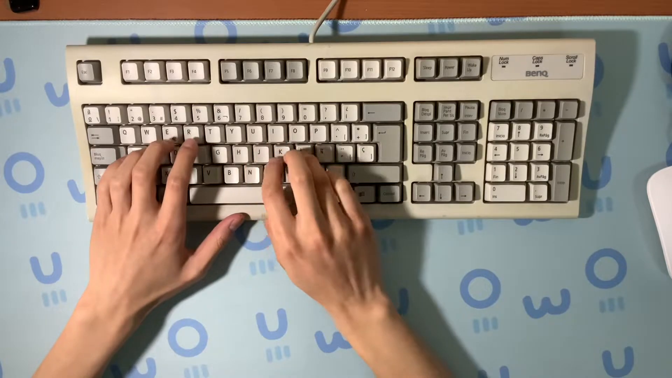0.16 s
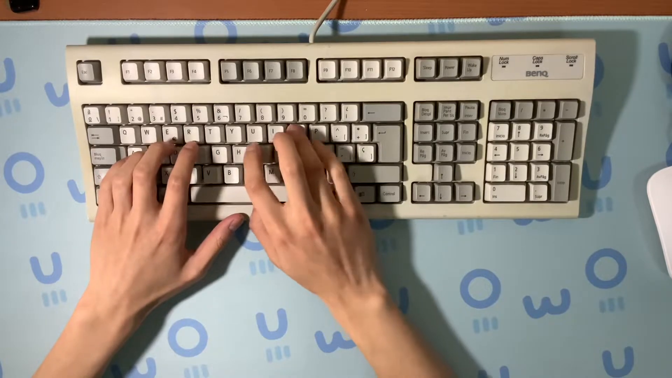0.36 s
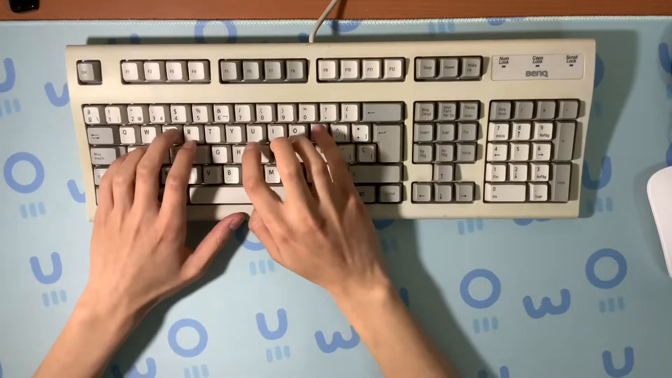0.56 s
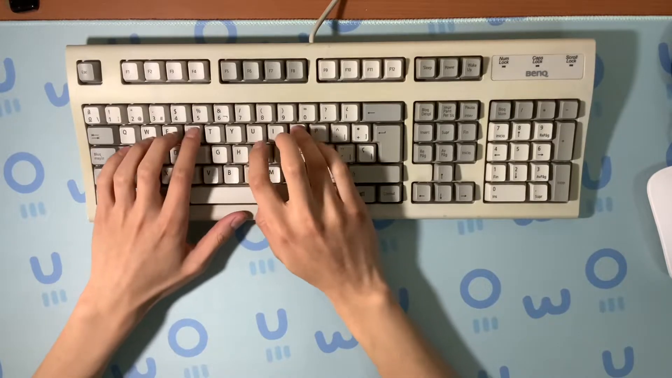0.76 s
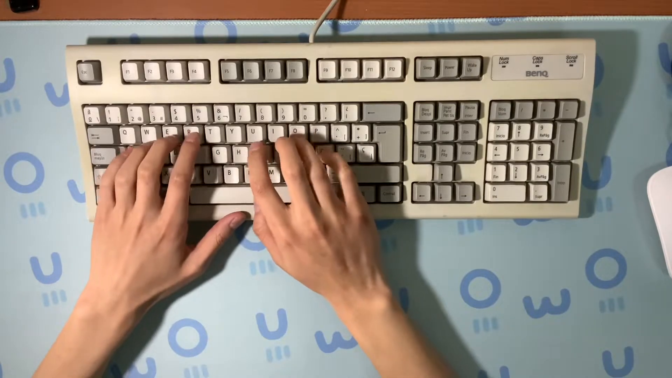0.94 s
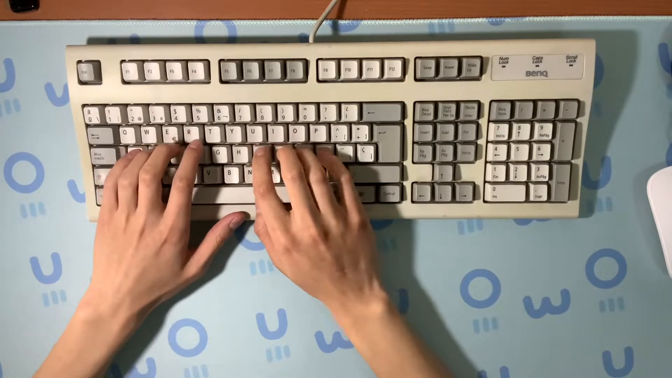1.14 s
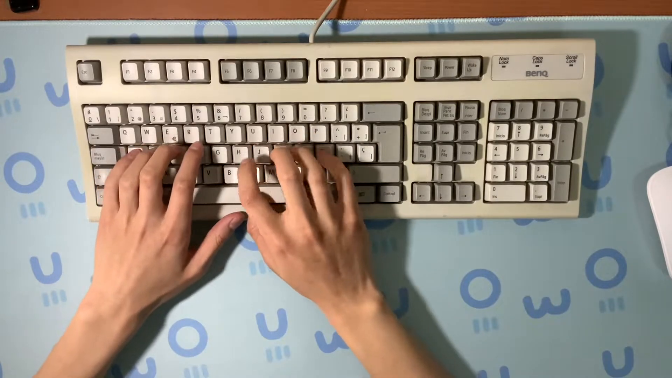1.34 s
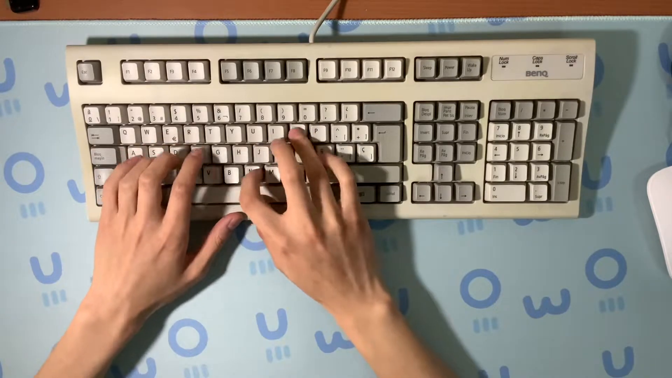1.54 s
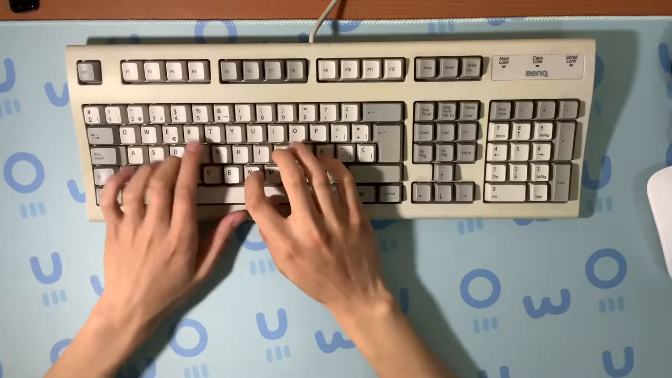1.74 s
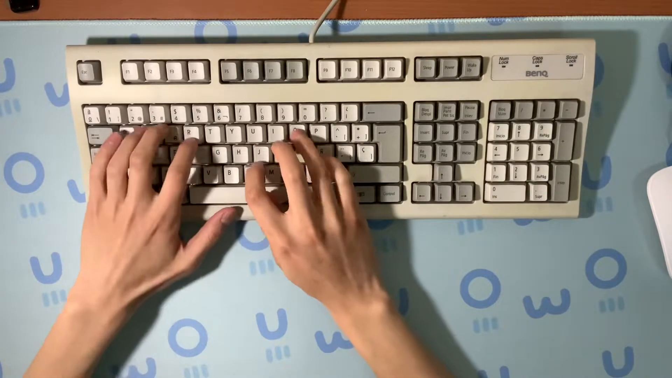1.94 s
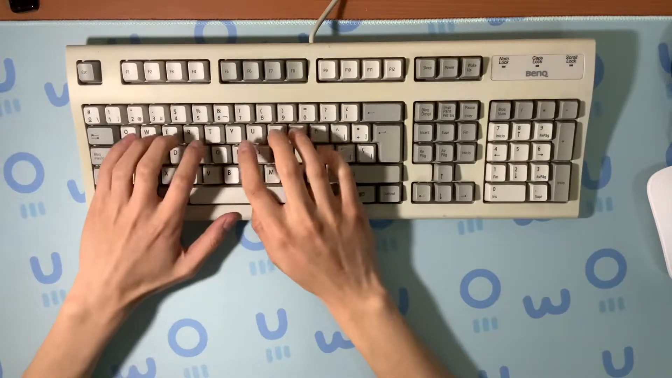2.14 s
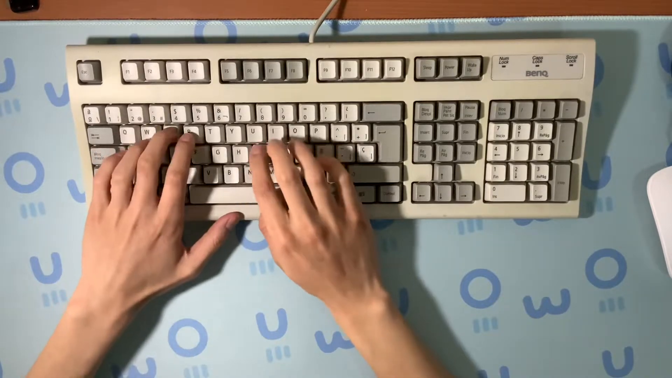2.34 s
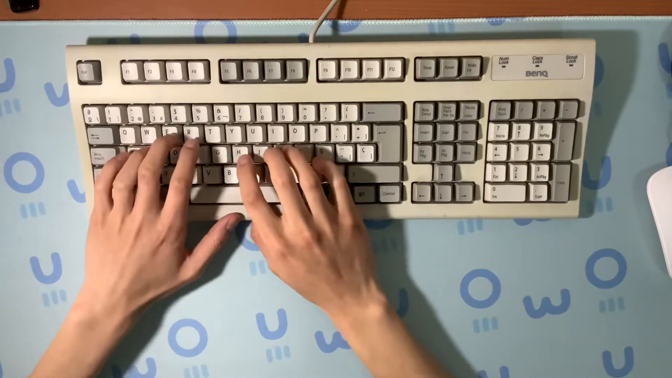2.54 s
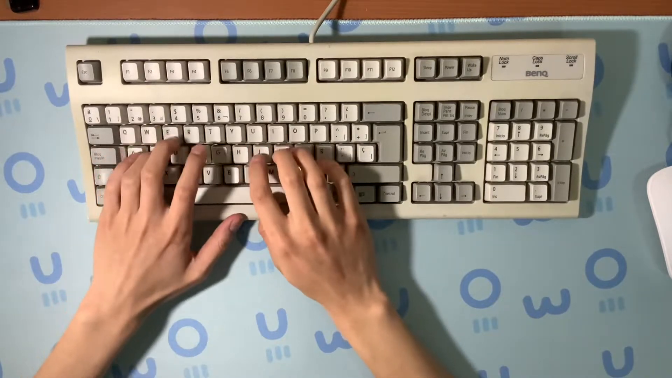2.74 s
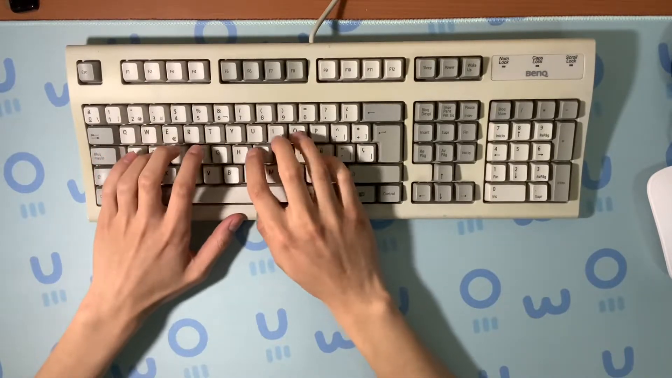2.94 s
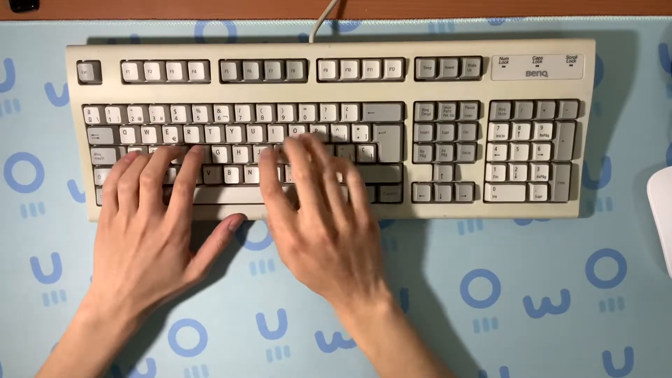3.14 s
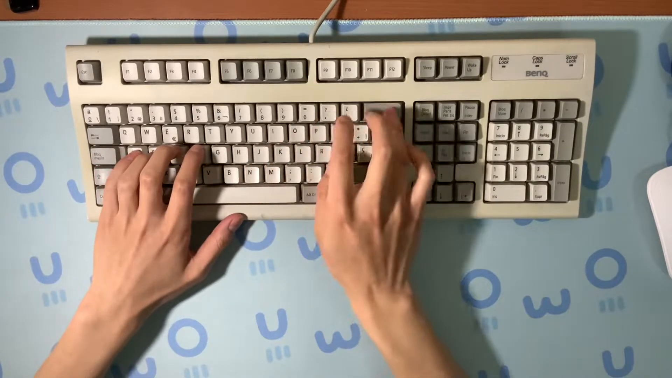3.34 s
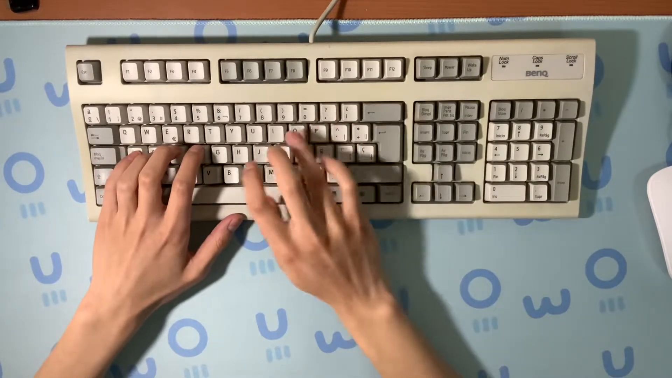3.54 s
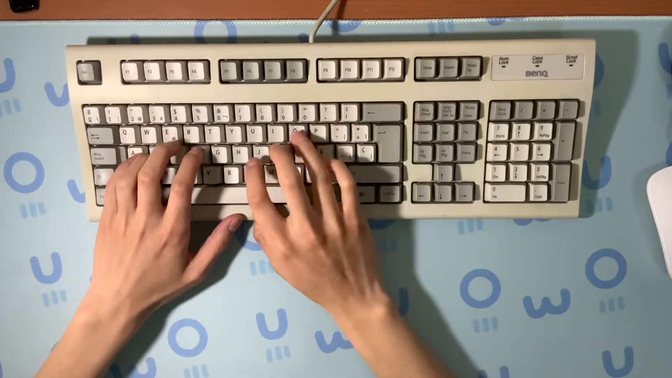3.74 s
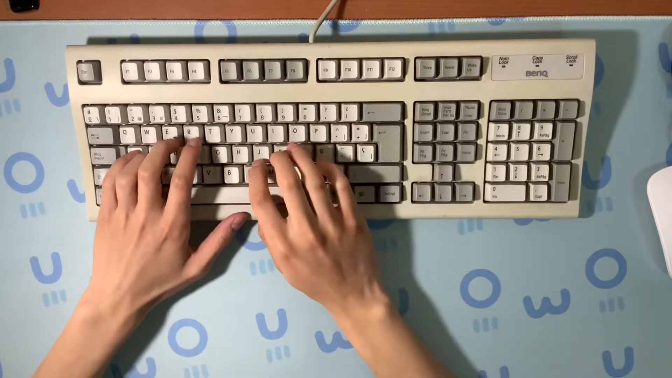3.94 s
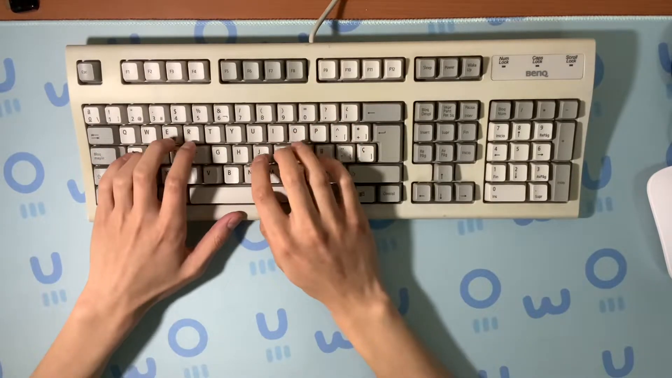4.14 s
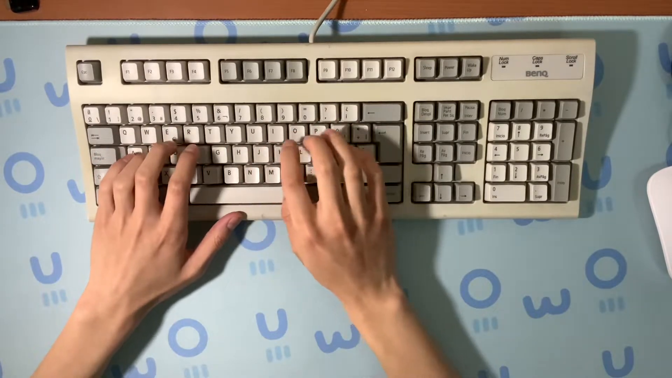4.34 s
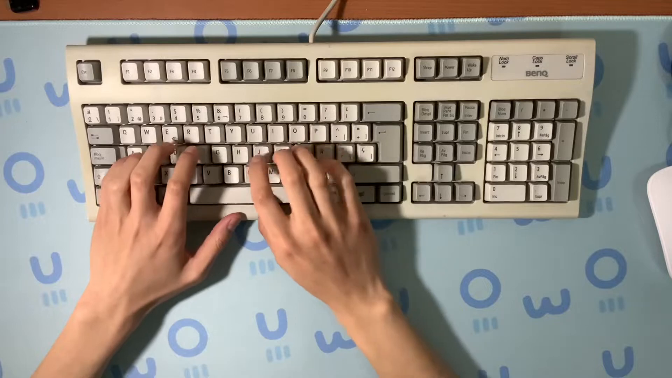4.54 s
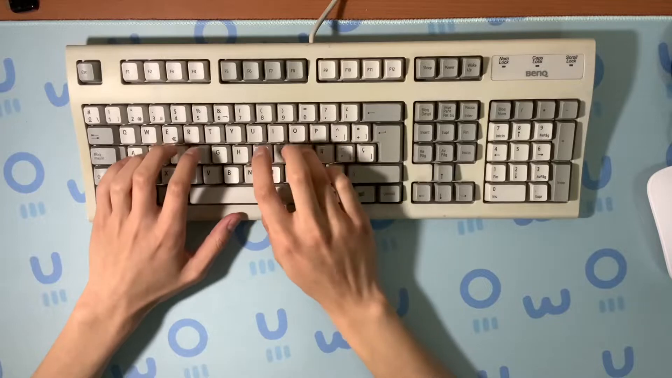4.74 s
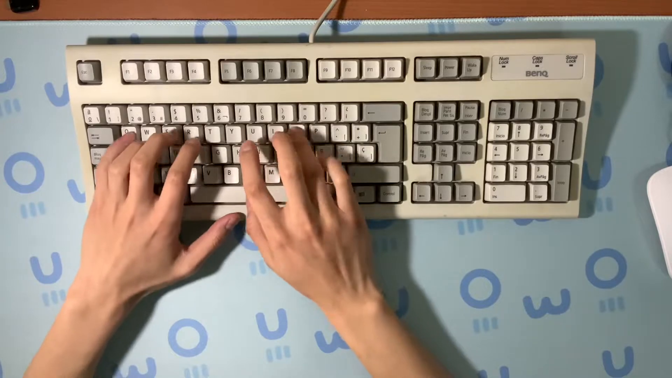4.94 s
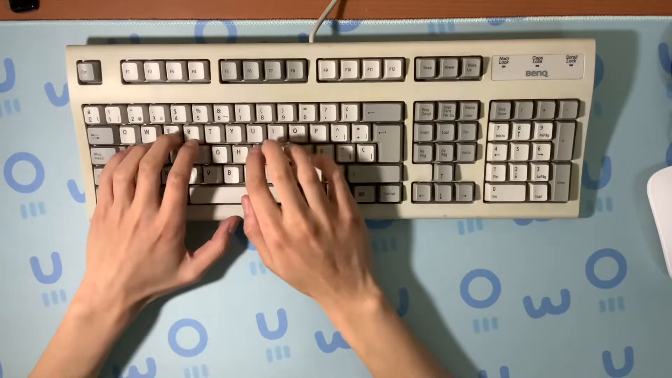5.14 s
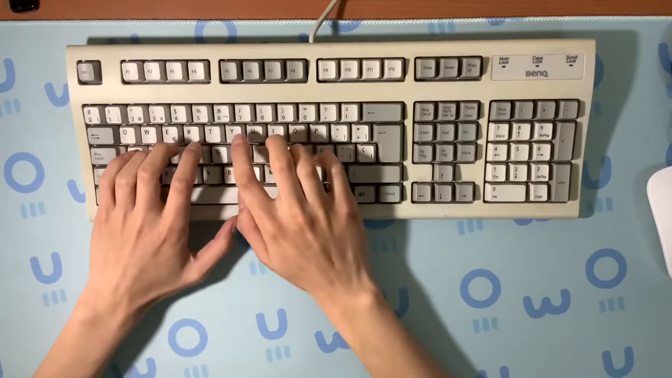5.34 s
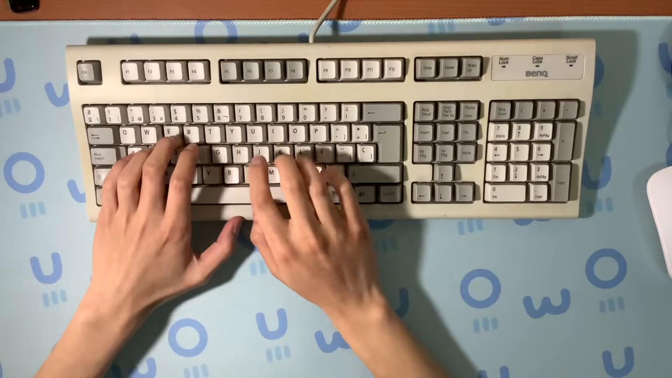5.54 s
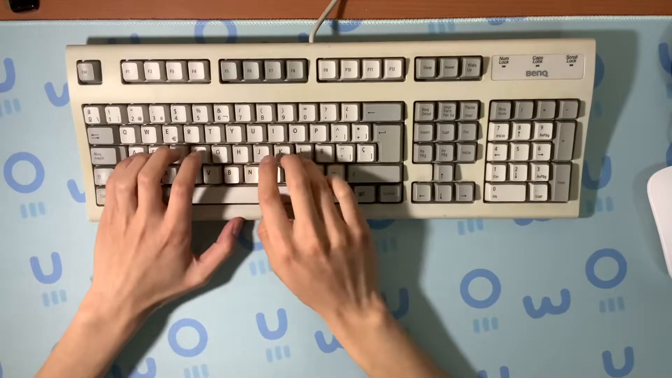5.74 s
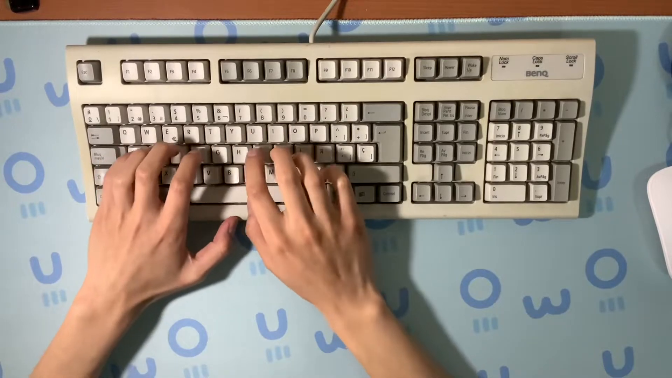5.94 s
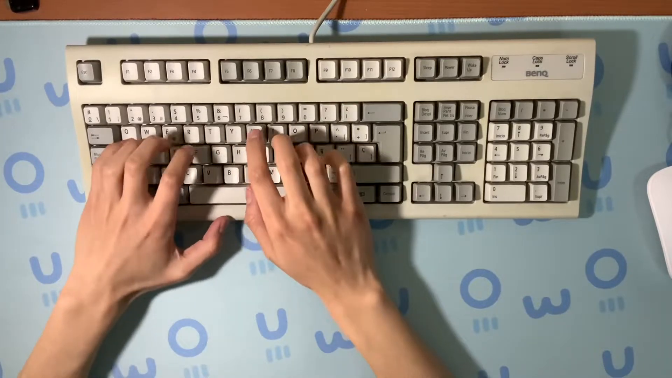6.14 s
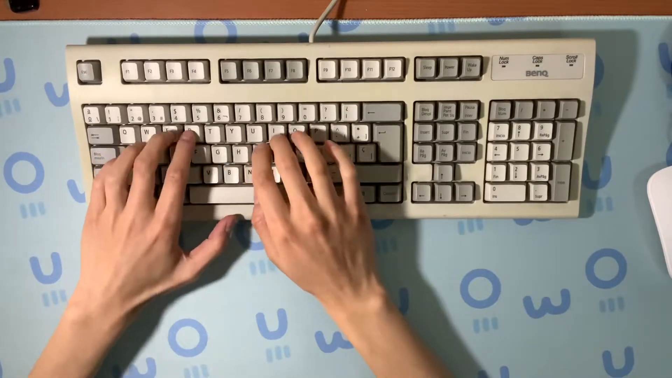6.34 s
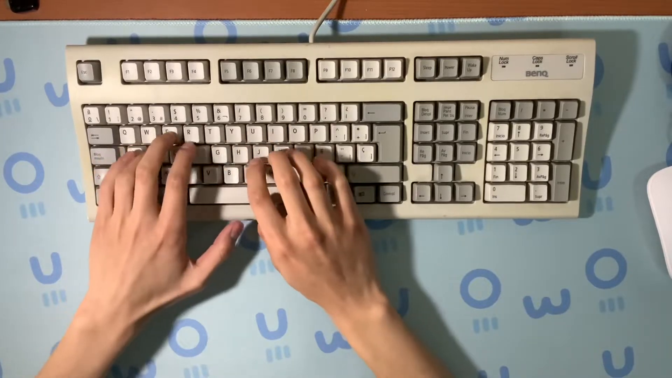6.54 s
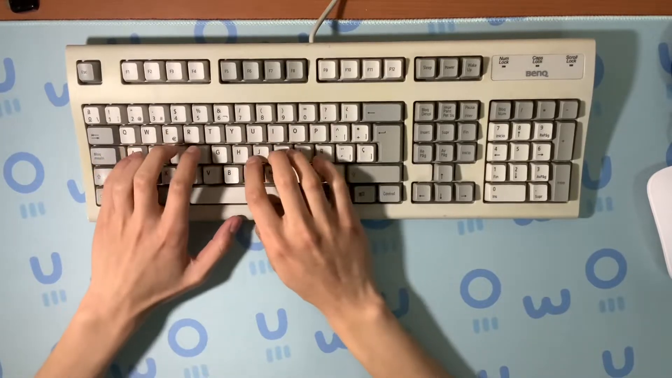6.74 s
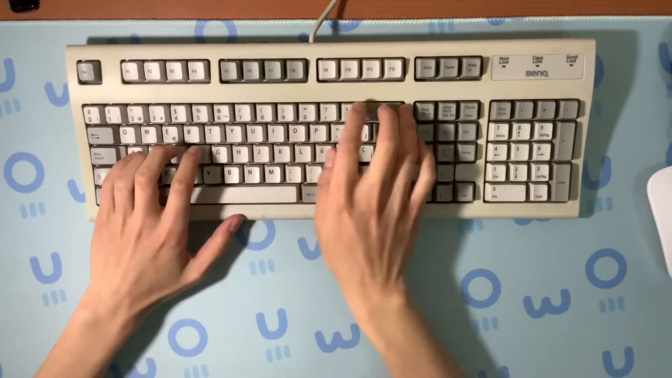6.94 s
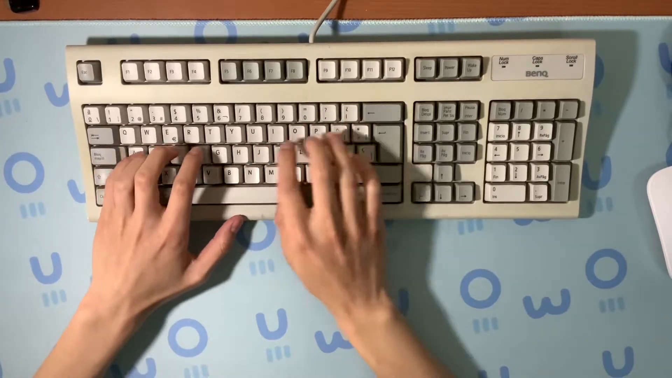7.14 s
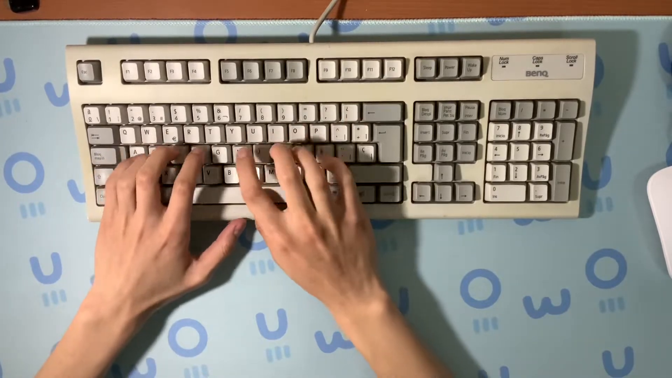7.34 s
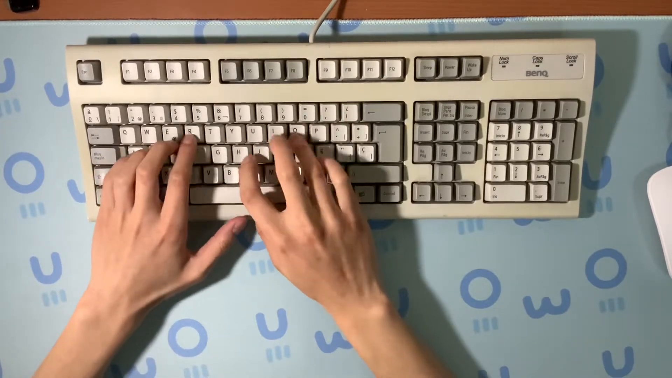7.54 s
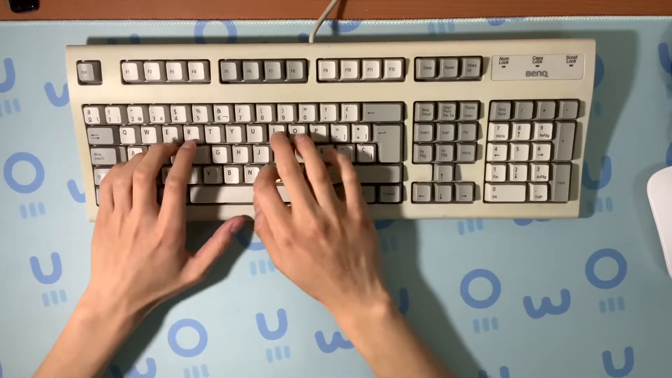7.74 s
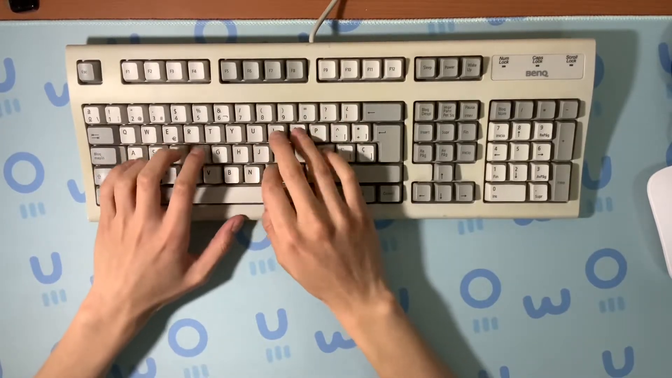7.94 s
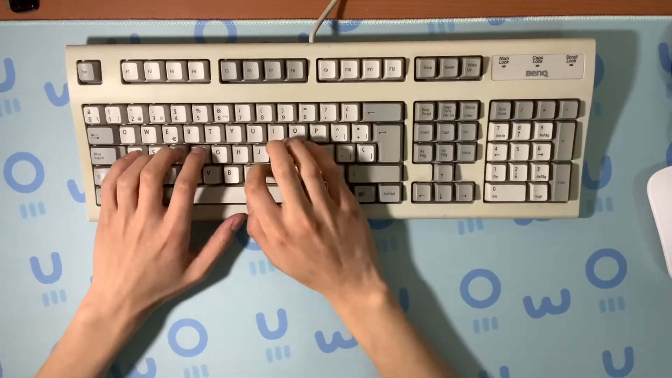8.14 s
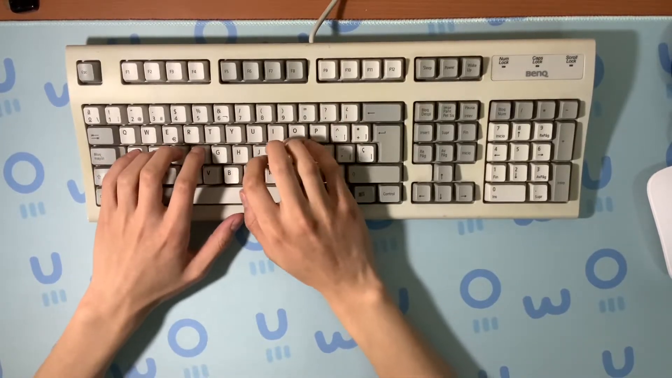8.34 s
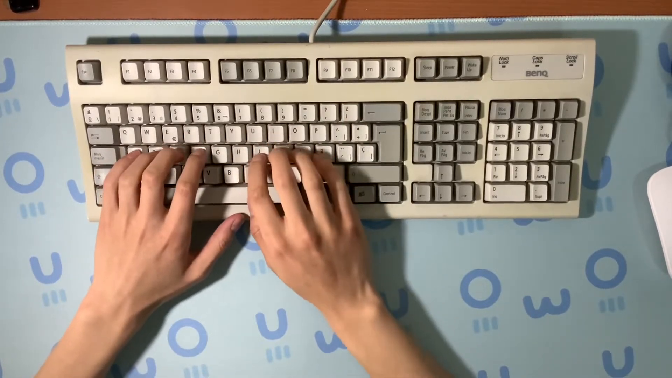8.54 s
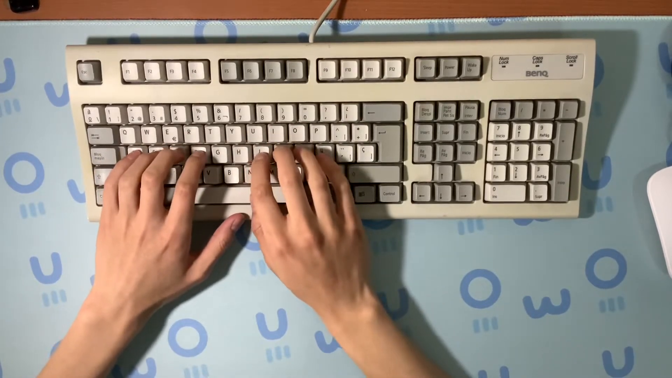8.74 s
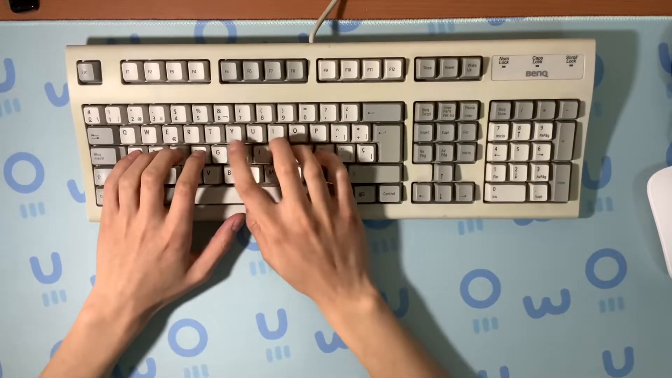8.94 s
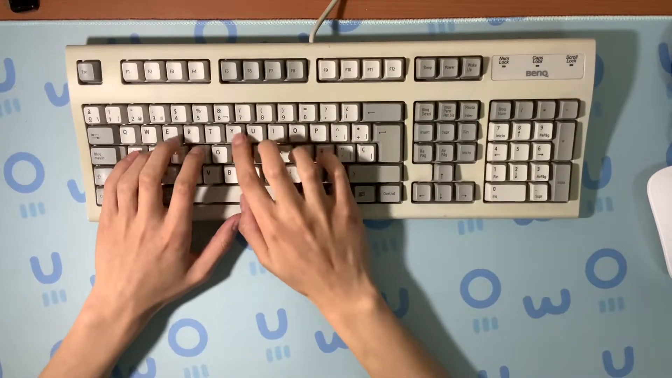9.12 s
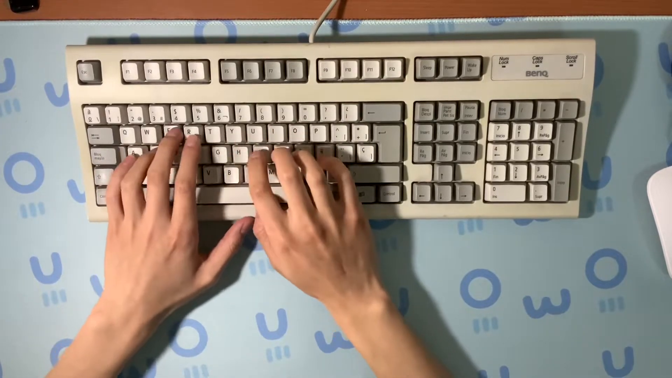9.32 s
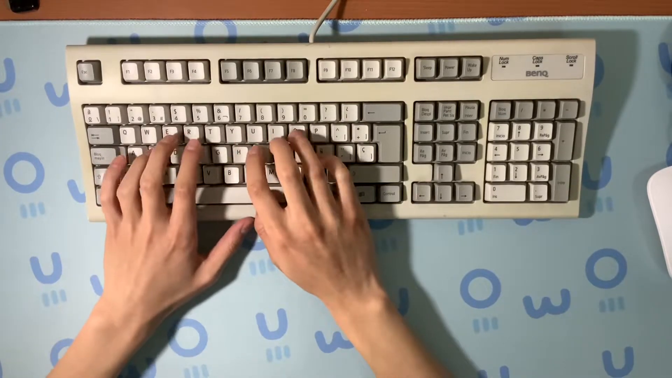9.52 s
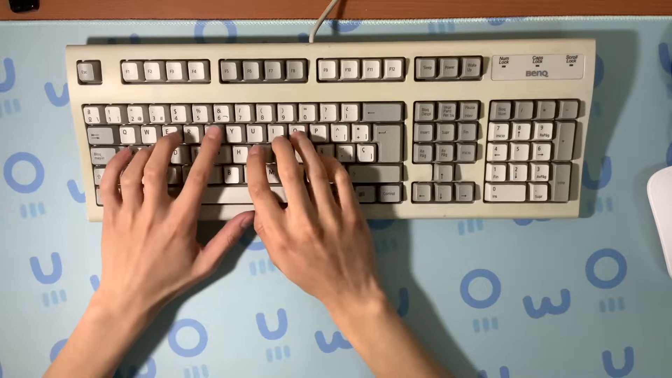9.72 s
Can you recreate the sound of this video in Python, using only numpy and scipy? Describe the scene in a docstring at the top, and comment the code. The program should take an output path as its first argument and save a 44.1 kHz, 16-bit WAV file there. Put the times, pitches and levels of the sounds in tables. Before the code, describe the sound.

Rapid, irregular keyboard typing, roughly a dozen or more key sounds per second, mixing bright press clicks with lighter release ticks. Hollow plastic knocks and soft, dull thuds through the mat and desk sit underneath. Typing halts a few times, most clearly after eight seconds with a barely audible finger rub, then resumes. Close, dry stereo pickup in a quiet small room.

```python
"""A clicky full-size keyboard, typed fast by touch, on a mat on a wooden desk in a quiet small room.
Each switch snaps and rattles its key cap: noise bursts plus damped modes.
Keys at their end stops knock the hollow case; full presses also shake back plate and desk: more damped modes.
Echoes flutter between desk and ceiling, with a diffuse room tail, a low rumble and a faint hiss.
A pair of close microphone ports above the hands hears it all; in one pause the fingers rub softly on the keys."""
import sys
import numpy as np
from scipy import signal
from scipy.fft import rfft, irfft, next_fast_len
from scipy.io import wavfile
from scipy.ndimage import uniform_filter1d

SR = 44100
rng = np.random.default_rng(int(sys.argv[2]) if len(sys.argv) > 2 else 0)


def to_wav(s):
    """Save 16-bit WAV."""
    ch = np.atleast_2d(s).T  # columns
    pcm = np.round(np.clip(ch, -1, 1) * 32767)  # PCM
    wavfile.write(sys.argv[1], SR, pcm.astype(np.int16))


N = 431298  # length of the take, samples
EARLY = SR // 100  # samples kept ahead of each contact
AGE = np.arange(-EARLY, SR // 3) / SR  # time since a contact, s
AFTER = np.maximum(AGE, 0)

# All event levels are relative: each layer adds its own offset when it is mixed.
# keys released, pressed lightly or just touched: [t/s, snap level/dB, key cap level/dB]
LIGHT_STROKES = [(.024, -41, -38), (.07, -36, -34.5), (0.281, -32.5, -33.5), (.33, -26, -32.5),
                 (.349, -27.5, -37.5), (0.395, -23, -35.5), (0.483, -27.5, -32), (.496, -34, -42),
                 (.605, -28.5, -37), (.657, -29, -38), (.71, -39.5, -37), (.788, -29, -41.5),
                 (.814, -25.5, -34), (0.881, -23.5, -37.5), (.943, -34, -34.5), (1.058, -49, -51.5),
                 (1.255, -83, -54.5), (1.325, -46, -51), (1.391, -30, -32), (1.519, -35, -39.5),
                 (1.607, -32, -41), (1.622, -30, -41), (1.639, -25, -31.5), (1.663, -32.5, -37.5),
                 (1.884, -34.5, -34.5), (1.924, -28, -36), (1.962, -32, -30.5), (1.969, -28, -44.5),
                 (2.012, -27.5, -39.5), (2.023, -26.5, -32), (2.093, -31, -32), (2.107, -39.5, -37),
                 (2.168, -31, -38.5), (2.286, -35.5, -39), (2.391, -28.5, -35.5), (2.444, -26, -37.5),
                 (2.48, -28, -45.5), (2.485, -20, -24.5), (2.521, -27.5, -48), (2.554, -29, -28),
                 (2.749, -34, -39.5), (2.793, -28, -35.5), (2.804, -25, -39), (2.837, -26.5, -30.5),
                 (2.845, -29, -51), (2.884, -42.5, -46), (2.948, -27, -37.5), (3.092, -28, -36.5),
                 (3.234, -25.5, -31.5), (3.339, -35, -42), (3.61, -28.5, -39), (3.638, -26.5, -42),
                 (3.643, -17.5, -25.5), (3.673, -27, -33.5), (3.704, -24, -42), (3.922, -28.5, -35),
                 (4.436, -45, -40), (4.541, -30, -37), (4.553, -21.5, -28.5), (4.568, -32, -33.5),
                 (4.656, -29, -27), (4.751, -37, -34), (4.798, -42, -35.5), (4.875, -34, -35.5),
                 (4.911, -27.5, -34), (4.941, -25.5, -33.5), (4.998, -28.5, -39.5), (5.107, -28.5, -39),
                 (5.18, -26, -33), (5.195, -18, -24.5), (5.278, -38, -26.5), (5.284, -30.5, -33.5),
                 (5.442, -54, -39.5), (5.652, -41, -40), (5.696, -28, -37.5), (5.808, -35.5, -43.5),
                 (5.817, -49, -36.5), (5.838, -28, -33), (5.869, -30, -40.5), (5.878, -25, -31),
                 (5.954, -30.5, -33), (6.167, -40.5, -36.5), (6.216, -33, -37), (6.255, -36, -36),
                 (6.274, -34.5, -34), (6.365, -32, -40), (6.414, -39.5, -34.5), (6.514, -30, -39),
                 (6.531, -25.5, -40), (6.537, -37, -35.5), (6.571, -32.5, -36.5), (6.627, -47.5, -48),
                 (6.681, -45, -50.5), (6.92, -29.5, -34.5), (6.933, -28.5, -42), (7.141, -30, -39),
                 (7.186, -23.5, -33.5), (7.28, -28, -33.5), (7.387, -37.5, -38.5), (7.396, -24.5, -31),
                 (7.519, -35.5, -37), (7.536, -30, -33), (7.59, -27, -40), (7.603, -24, -32),
                 (7.626, -27.5, -40), (7.671, -26, -31), (7.74, -27.5, -47), (7.749, -30, -30),
                 (7.899, -31.5, -39.5), (7.994, -22.5, -32), (8.07, -32, -42.5), (8.082, -28, -32.5),
                 (8.132, -29.5, -34.5), (8.146, -52, -37), (8.341, -83, -60.5), (8.438, -79.5, -63.5),
                 (8.465, -59.5, -58.5), (8.9, -59, -47.5), (8.957, -71, -55), (8.992, -40, -39.5),
                 (9.096, -22, -28), (9.188, -25, -38), (9.196, -28, -29), (9.407, -30, -35.5),
                 (9.454, -29, -38), (9.644, -82, -55.5), (9.71, -28, -36)]
# keys pressed to the bottom: [t/s, snap level/dB, key cap level/dB, travel from click to end stop/s,
# case level/dB, case tilt/dB per octave, weight on the desk/dB]
FULL_PRESSES = [(.001, -41, -32.5, .001, -28, 7.5, -52.5), (.119, -29, -36, 0.0033, -33.5, 15, -53),
                (0.195, -33.5, -33, 0.0034, -39, -4, -77), (.286, -29, -41, 0.0057, -34, -14, -55),
                (0.353, -21, -24, .001, -34.5, -19, -62), (0.458, -42.5, -37.5, 0.0041, -40.5, -9, -57),
                (0.59, -34, -37, 0.0077, -39, -8, -54), (.745, -33.5, -37.5, .005, -33.5, 0, -60),
                (.839, -19, -24.5, 0.0029, -35.5, 2, -61), (.931, -31, -35.5, .008, -51.5, -7, -64.5),
                (1.409, -37.5, -40.5, .007, -34, -13, -60.5), (1.462, -30, -37.5, .003, -37.5, 2, -60),
                (1.554, -17, -23, 0.0016, -49.5, 15, -62), (1.739, -29, -32, 0.00072, -34.5, -2, -67.5),
                (1.794, -30, -37.5, 0.0055, -35, 5, -55.5), (1.938, -32, -42.5, .01, -34.5, 4, -56),
                (2.067, -26.5, -31.5, 0.00073, -31.5, 6, -50.5),
                (2.199, -25.5, -33, 0.011, -37, -34, -57.5), (2.3, -30.5, -37, .004, -41, -1, -60),
                (2.547, -26.5, -40, .004, -41, -22, -69), (2.59, -34.5, -34.5, .004, -31.5, -1, -51),
                (2.677, -35, -39, 0.0065, -39.5, 9, -65.5), (2.96, -47, -31, 0.0078, -29.5, -2, -56.5),
                (3.246, -30, -31.5, 0.00093, -28, 10, -58), (3.303, -29.5, -33, .007, -38, 9, -65),
                (3.347, -29.5, -34.5, .003, -27, 14, -63), (3.417, -25, -26, 0.0012, -32.5, 9, -68),
                (3.552, -23, -30.5, 0.00087, -35, -4, -53.5), (3.708, -27.5, -24.5, 0.0013, -37, -6, -72),
                (3.739, -31, -34, .007, -38.5, -9, -63.5), (3.787, -35.5, -33.5, .009, -35, -13.5, -49),
                (4.455, -33.5, -36, 0.0018, -30, 10, -53), (4.575, -22.5, -29.5, .001, -49, 7, -62),
                (4.666, -29, -33.5, .01, -39.5, 3, -52.5), (4.813, -29, -33.5, 0.0055, -34, 6, -51),
                (4.922, -22, -31, .007, -38, 25, -59), (5.01, -23, -25.5, .011, -32, -8, -58.5),
                (5.122, -36, -34, .007, -37, -20, -50), (5.464, -34.5, -32, .006, -34, -12, -48),
                (5.571, -27, -28.5, 0.005, -37.5, 5, -53), (5.757, -29, -38, .005, -35, -5, -57.5),
                (5.942, -27.5, -30.5, .009, -45, 24.5, -66.5), (6.09, -36.5, -34.5, .002, -38, 19, -55),
                (6.185, -30.5, -33, .006, -33, -21, -53.5), (6.296, -31.5, -34.5, 0.0069, -38.5, -14, -50),
                (6.318, -31.5, -34, .005, -36, -1, -63.5), (6.443, -30.5, -32, .007, -33, 17, -49.5),
                (7.02, -19.5, -24.5, .001, -30.5, 15.5, -56.5),
                (7.218, -20.5, -27.5, 0.00064, -35, -6, -58),
                (7.292, -23.5, -30.5, 0.00086, -39.5, -9, -59.5),
                (7.305, -31, -37, .004, -32.5, -17, -56.5), (7.459, -27, -31.5, .006, -32, 2, -50),
                (7.696, -35.5, -42, .008, -34, 2, -54), (7.732, -36, -34, .006, -38.5, -1, -70.5),
                (7.81, -27.5, -32, .005, -32.5, 4, -59.5), (7.913, -31, -33.5, 0.0031, -30, -6, -54.5),
                (8.022, -18, -25.5, 0.0013, -33.5, -20.5, -59.5),
                (8.999, -33, -37.5, 0.0044, -24.5, 8.5, -63.5), (9.113, -20, -27, .004, -50, -3, -59.5),
                (9.259, -34.5, -40.5, .007, -38, -6, -52), (9.315, -35.5, -38.5, 0.008, -34, 30, -66),
                (9.541, -32, -37.5, .007, -38.5, -3, -55.5)]


def amp(db):
    """Decibels to gain."""
    return 10 ** (np.asarray(db) / 20)


def along(points, hz):
    """Read (f/Hz, value) points on a log frequency axis."""
    f, value = np.transpose(points)
    return np.interp(np.log(hz + 1), np.log(f + 1), value)


def filtered(x, response):
    """Multiply the spectrum of x by a complex response of frequency."""
    size = next_fast_len(N + SR // 2)
    hz = np.fft.rfftfreq(size, 1 / SR)
    return irfft(rfft(x, size) * response(hz), size)[..., :N]


def coloured(x, spectrum, size=2048):
    """A causal minimum-phase filter of unit energy with the given spectral shape."""
    hz = np.fft.rfftfreq(size, 1 / SR)
    cepstrum = irfft(np.log(amp(along(spectrum, hz))))
    # folding the cepstrum forward puts the energy as early as possible
    cepstrum[1:size // 2] *= 2
    cepstrum[size // 2 + 1:] = 0
    kernel = irfft(np.exp(rfft(cepstrum)))
    kernel = kernel / np.linalg.norm(kernel)
    return signal.fftconvolve(x, kernel[None], axes=1)[:, :N]


def levelled(x, span):
    """Scale each row so that its loudest span (s) has rms 1."""
    power = uniform_filter1d(x ** 2, max(int(span * SR), 1), axis=1)
    return x / np.sqrt(power.max(axis=1, keepdims=True))


def add(track, s, sound):
    """Mix in a sound whose contact falls at time s."""
    start = round(s * SR) - EARLY
    lo, hi = max(start, 0), min(start + sound.shape[1], N)
    track[:, lo:hi] += sound[:, lo - start:hi - start]


def chatter(rise, fall, lead_db, tail_db, tail, grain_db, size=4000):
    """A cluster of tiny contacts: the stem may scrape in, the burst peaks and dies, a looser rattle follows."""
    t, after = AGE[:size], AFTER[:size]
    scrape = rng.uniform() ** 3 * amp(lead_db) * np.clip(1 + t / .005, 0, 1) * (t < 0)
    swell = np.exp(np.minimum(t, 0) / rise) + scrape
    shape = swell * (np.exp(-after / fall) + amp(tail_db) * np.exp(-after / tail))
    # the bounces, about 800 a second, grow more uneven as they fade
    knots = np.arange(0, size, SR // 800)
    bounces = np.interp(np.arange(size), knots, rng.uniform(-1, 1, len(knots)))
    looseness = np.clip(.5 + after / 0.0058, 0, 1.2)
    grain = amp(grain_db * looseness * bounces)
    return shape * grain * rng.standard_normal((2, size))


def ring(modes, attack, detune, scatter_db, size):
    """Damped modes; each place of contact gives them new strengths, signs and slightly new pitches."""
    hz, db, t60 = np.transpose(modes)
    t = AFTER[:size]
    pitch = hz * np.exp(detune * rng.standard_normal(len(hz)))
    phase = rng.uniform(0, 2 * np.pi, (len(hz), 1))
    decay = np.exp(-np.log(1000) * t / t60[:, None])
    waves = np.sin(2 * np.pi * pitch[:, None] * t + phase) * decay
    strength = amp(db + scatter_db * rng.standard_normal((2, len(hz))))
    signs = rng.choice([-1, 1], (2, len(hz)))
    return (strength * signs) @ waves * (1 - np.exp(-t / attack))


def hush():
    """The room's steady low rumble and faint hiss: noise of a fixed colour."""
    # colour of the quiet room: [f/Hz, relative level/dB]
    hush_colour = [(15, -30.5), (25, -8), (80, 1), (270, -21.5), (354, -21.5), (1160, -26), (1400, -27),
                   (2160, -19.5), (2760, -28.5), (3160, -28.5), (16000, -42)]
    return amp(-71) * coloured(rng.standard_normal((2, N)), hush_colour, size=8192)


def contacts():
    """Every stroke clicks its switch; at times the loose cap ticks again. Rows of (t/s, snap/dB, cap/dB)."""
    wobble_share, wobble_delay_s, wobble_db = .4, (.006, .03), -13
    strokes = np.array([row[:3] for row in FULL_PRESSES] + LIGHT_STROKES)
    chance, wait = rng.uniform(size=(len(strokes), 2)).T
    wobbles = strokes + [0, wobble_db, wobble_db]
    wobbles[:, 0] += np.interp(wait, [0, 1], wobble_delay_s)
    return np.vstack([strokes, wobbles[chance < wobble_share]])


def switches():
    """The click spring snaps brightly; the loose key cap rattles and rings with it."""
    # colours of the spring snap and the plastic rattle: [f/Hz, relative level/dB]
    snap_colour = [(1500, -22), (5000, -10.5), (8000, -8.5), (9200, -8.5), (10500, -3), (11900, -2.5),
                   (13300, -0.5), (15000, -1.5), (15700, -2.5), (16100, -22)]
    rattle_colour = [(100, -11), (500, -19), (900, 3), (1400, -6), (2200, 6), (3600, -0.5), (5500, -2),
                     (7000, -3.5), (8200, -9), (15500, -10.5), (16200, -20.5)]
    # modes of the key caps: [f/Hz, relative level/dB, t60/s]
    cap_modes = [(1670, 0, .04), (1990, -3, .025), (2270, -1, .035), (2870, -1, .03), (3250, -4, .025),
                 (4170, -3, .025)]
    snaps, rattles, caps = np.zeros((3, 2, N))
    for s, snap_db, cap_db in contacts():
        snap = chatter(rise=.0011, fall=.002, lead_db=-11, tail_db=-14, tail=.009, grain_db=8)
        rattle = chatter(rise=0.0027, fall=0.0013, lead_db=-14, tail_db=-6.5, tail=0.011, grain_db=16)
        # no two caps ring alike
        ringing = ring(cap_modes, attack=0.00077, detune=.06, scatter_db=5.5, size=4000)
        add(snaps, s, amp(snap_db + 2.0) * levelled(snap, span=0.0023))
        add(rattles, s, amp(cap_db + 0.5) * levelled(rattle, span=0.0022))
        add(caps, s, amp(cap_db - 7.0) * levelled(ringing, span=0.0074))
    return coloured(snaps, snap_colour) + coloured(rattles, rattle_colour) + caps


def end_stops():
    """After its click a key travels to its end stop, hard or lightly. Rows of (t/s, case/dB, tilt/dB per octave)."""
    hard = [(s + travel, case_db, tilt) for s, _, _, travel, case_db, tilt, _ in FULL_PRESSES]
    # a light knock is set against the level of its own key cap
    light_travel_s, light_knock_db, light_tilt = 0.002977, -13, 4.5
    light = [(s + light_travel_s, cap_db + light_knock_db, light_tilt) for s, _, cap_db in LIGHT_STROKES]
    return hard + light


def case():
    """A key at its end stop knocks the hollow case; the place of the key favours its low or its high modes."""
    # modes of the case: [f/Hz, relative level/dB, t60/s]
    case_modes = [(720, -7, .018), (810, -4, .018), (895, 0, .03), (1030, -1, .016), (1220, -3, .018),
                  (1390, -8, .018)]
    # dull colour of the hollow case: [f/Hz, relative level/dB]
    hollow_colour = [(150, -25), (400, -7), (700, -18), (950, 11.5), (1400, -12), (2300, -4.5), (5000, -31)]
    knocks, clatter = np.zeros((2, 2, N))
    for s, db, tilt in end_stops():
        modes = [(hz, level + tilt * np.log2(hz / 1000), t60) for hz, level, t60 in case_modes]
        knock = ring(modes, attack=.0007, detune=.045, scatter_db=3, size=3500)
        burst = chatter(rise=0.0012, fall=0.002, lead_db=-15.5, tail_db=-5.5, tail=0.014, grain_db=10)
        add(knocks, s, amp(db - 1) * levelled(knock, span=.005))
        add(clatter, s + .001, amp(db - 2) * levelled(burst, span=0.004))
    return knocks + coloured(clatter, hollow_colour)


def thuds():
    """A full press weighs on desk and, more steeply, on the back plate. Rows of (t/s, desk/dB, plate/dB)."""
    usual_db = -51
    desk_grows, plate_grows = 0.69, 1.5  # dB gained per dB of extra weight
    s, _, _, travel, _, _, weight_db = np.transpose(FULL_PRESSES)
    extra_db = weight_db - usual_db
    return zip(s + travel, usual_db + desk_grows * extra_db, usual_db + plate_grows * extra_db)


def desk():
    """Full presses bend the back plate quickly and, through the soft mat, the desk top more slowly."""
    # modes of the desk top and of the back plate: [f/Hz, relative level/dB, t60/s]
    desk_modes = [(38, -17, 0.23), (57, -5, 0.17), (74.6, -25.5, 0.64), (111.15, -2.5, 0.23),
                  (133, -0.5, 0.12), (176, -10.5, 0.21)]
    plate_modes = [(234, 4, 0.062), (283, -2.5, .06), (422, 1, 0.1), (495, -6, 0.094), (620, -12.5, 0.033)]
    out = np.zeros((2, N))
    for s, desk_db, plate_db in thuds():
        sway = ring(desk_modes, attack=0.065, detune=0.025, scatter_db=2, size=len(AGE))
        bump = ring(plate_modes, attack=0.0052, detune=0.077, scatter_db=2, size=6000)
        add(out, s, amp(desk_db - 2.5) * levelled(sway, span=0.08))
        add(out, s, amp(plate_db - 2.0) * levelled(bump, span=0.034))
    return out


def room(x, build, count=72):
    """A diffuse tail of decaying noise, drawn anew for each of count equal stretches of the direct sound."""
    # the room's decay: [f/Hz, t60/s]
    decay = [(100, .33), (300, .23), (900, .21), (2000, .27), (5000, .28), (13000, .22)]
    # strength of the room against the direct sound: [f/Hz, level/dB]
    strength = [(100, 1.5), (400, -1.0), (1000, -6.0), (1600, -5.5), (6000, -5.0), (14000, -14)]
    out = np.zeros((2, N + SR))
    for part in np.array_split(np.arange(N), count):
        hz, t, z = signal.stft(rng.standard_normal((2, SR // 2)), SR, nperseg=256)
        fade = amp(-60 * t / along(decay, hz)[:, None]) * (1 - np.exp(-t / build))
        tail = signal.istft(z * fade, SR, nperseg=256)[1]
        wet = signal.fftconvolve(x[:, part], tail / np.linalg.norm(tail[0]), axes=1)
        out[:, part[0]:part[0] + wet.shape[1]] += wet
    return filtered(out, lambda hz: amp(along(strength, hz)))


def flutter(x, trip, first_db, loss_db, dull_hz, count=5):
    """Echoes that bounce between desk and ceiling, one per round trip (s), all dulled in the treble."""
    def response(hz):
        echoes = 0
        for k in range(count):
            delay = np.exp(-2j * np.pi * hz * trip * (k + 1))
            echoes = echoes + amp(first_db - k * loss_db) * delay
        return echoes / (1 + (hz / dull_hz) ** 2)

    return filtered(x, response)


def fingers(s, length, db):
    """In a pause the fingers shift softly on the resting keys: dull noise under one smooth swell."""
    # colour of the rub: [f/Hz, relative level/dB]
    rub_colour = [(60, -5.5), (140, 0.0), (250, -16), (400, -1), (900, -7), (2500, -19), (8000, -62)]
    stroke = np.exp(-((np.arange(N) / SR - s) / length) ** 2)
    rub = coloured(rng.standard_normal((2, N)), rub_colour)
    return amp(db) * stroke * rub


def ports(field, alike):
    """The first row reaches both ports alike, the second sets them apart; their lag and balance vary with pitch."""
    # how far the left port leads the right: [f/Hz, lead/cycles]
    lead = [(0, 0), (1200, .15), (1550, -.25), (2700, .45), (3200, 1.05), (4200, 1.45), (5400, 3.05),
            (7600, 3.55), (9200, 4), (12350, 5), (18000, 7)]
    # left minus right: [f/Hz, level/dB]
    balance = [(250, -2), (500, 1.5), (950, 2), (1500, -4.5), (2300, 2), (2880, -2), (3300, 2),
               (14000, 0.2)]
    sides = np.array([[1], [-1]])

    def split(hz):
        turn = np.arccos(np.clip(along(alike, hz), 0, 1)) / 2
        return np.array([np.cos(turn), np.sin(turn)])

    def steer(hz):
        # each port takes half of the lead and half of the balance
        phase = np.pi * np.interp(hz, *np.transpose(lead)) * sides
        return np.exp(1j * phase) * amp(sides * along(balance, hz) / 2)

    common, apart = filtered(field, split)
    return filtered(np.array([common + apart, common - apart]), steer)


def scene():
    """Keyboard and desk, heard close by and through the room."""
    # likeness of the two ports for the near sound and for the diffuse room: [f/Hz, coherence]
    near_alike = [(150, 1), (400, 0.55), (600, 0.29), (900, .93), (1400, 0.11), (2200, 1), (3100, 0.22),
                  (5600, 0.63), (7000, 0.081), (8800, 0.86), (9400, 0.96), (12000, .93)]
    room_alike = [(150, 0.93), (700, 0.2), (1500, 1), (7500, 0.033), (9500, 1)]
    direct = switches() + case() + desk() + fingers(s=8.39, length=0.057, db=-63.5)
    echoes = flutter(direct, trip=.01002, first_db=-12, loss_db=7, dull_hz=1800)
    diffuse = room(direct, build=0.0022) + hush()
    return ports(direct + echoes, near_alike) + ports(diffuse, room_alike)


def record(dry):
    """The recorder keeps nothing from its band limit upward."""
    top_hz = 16600
    return filtered(dry, lambda hz: hz < top_hz)


dry = scene()
out = record(dry)
to_wav(out)
```